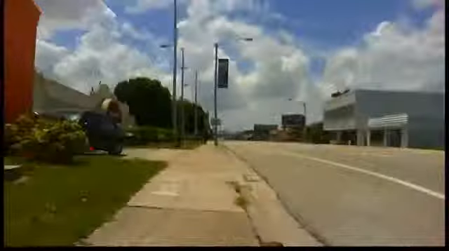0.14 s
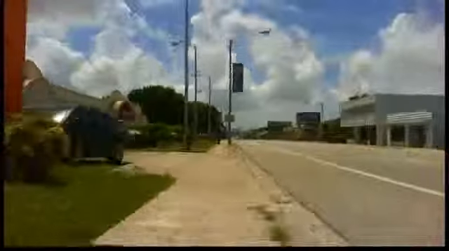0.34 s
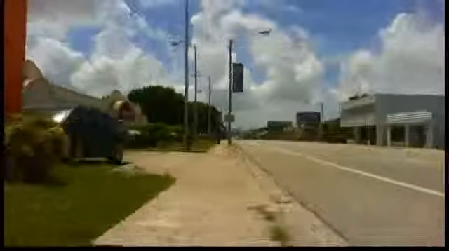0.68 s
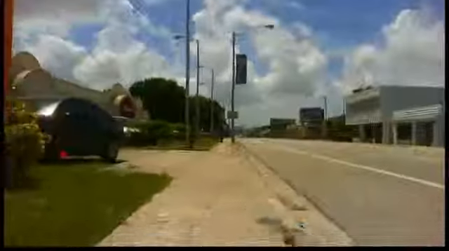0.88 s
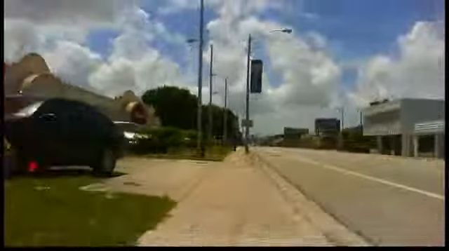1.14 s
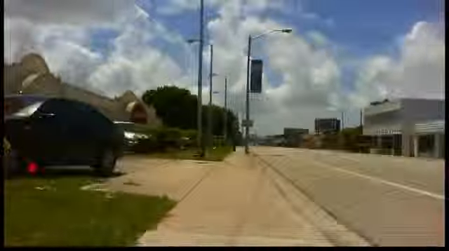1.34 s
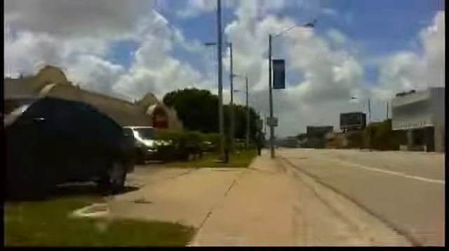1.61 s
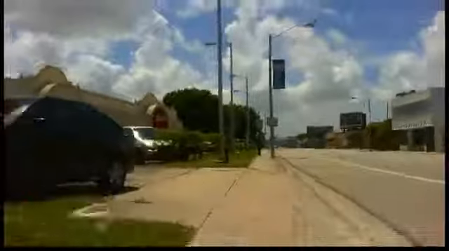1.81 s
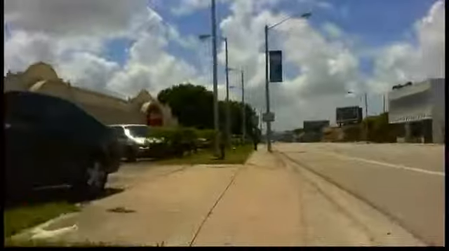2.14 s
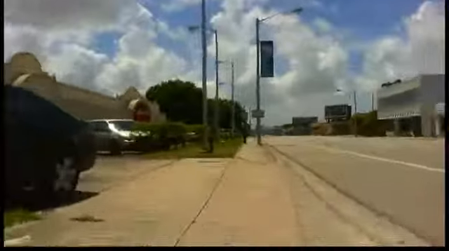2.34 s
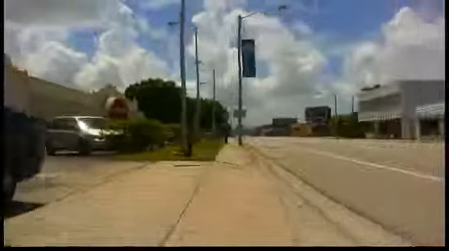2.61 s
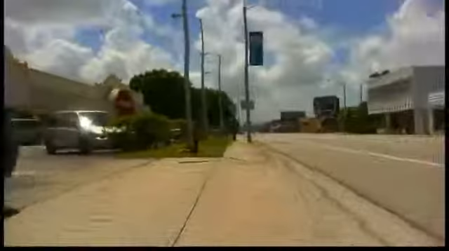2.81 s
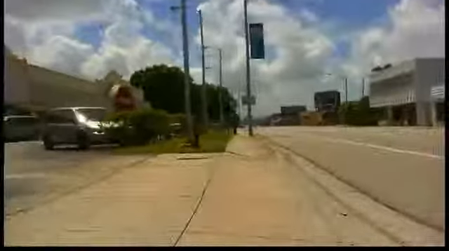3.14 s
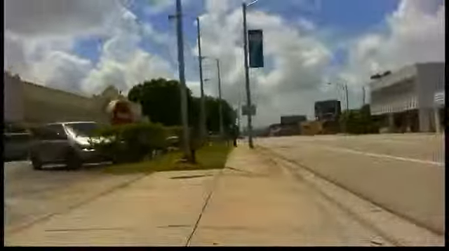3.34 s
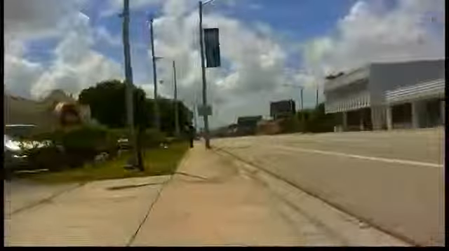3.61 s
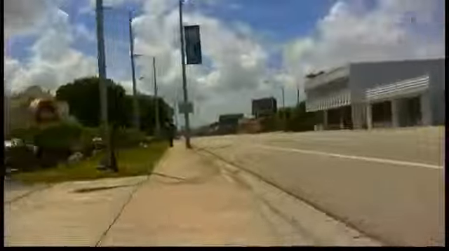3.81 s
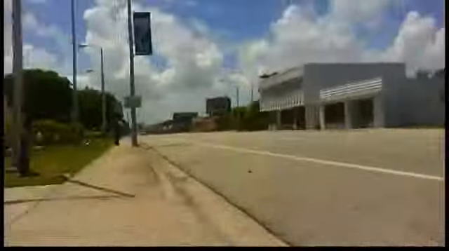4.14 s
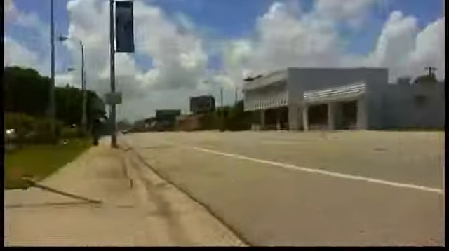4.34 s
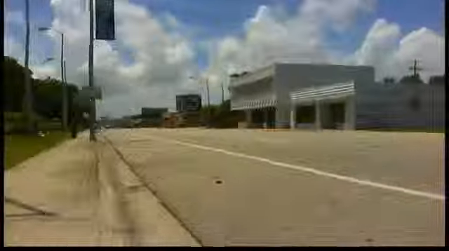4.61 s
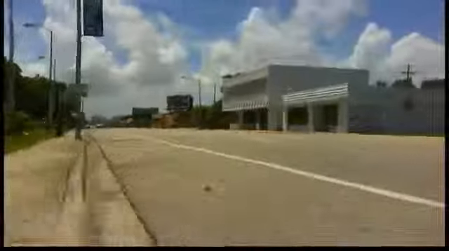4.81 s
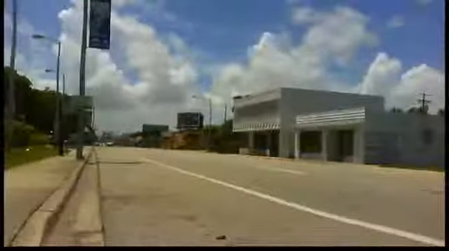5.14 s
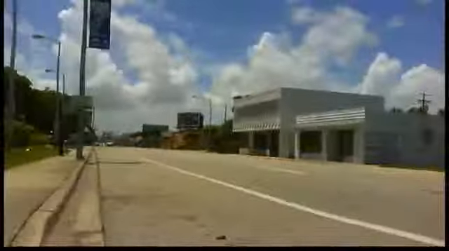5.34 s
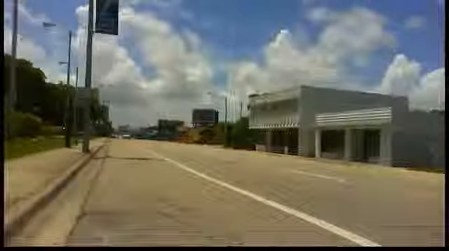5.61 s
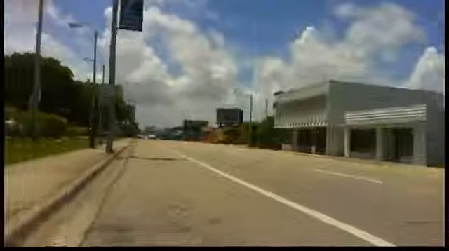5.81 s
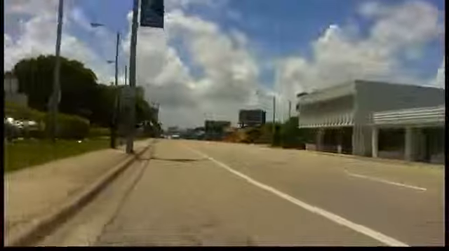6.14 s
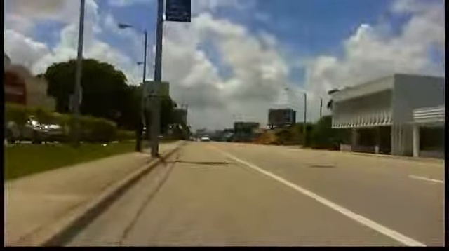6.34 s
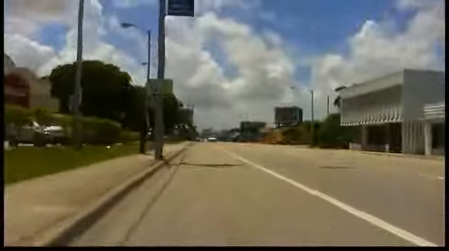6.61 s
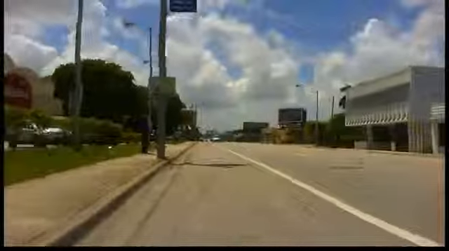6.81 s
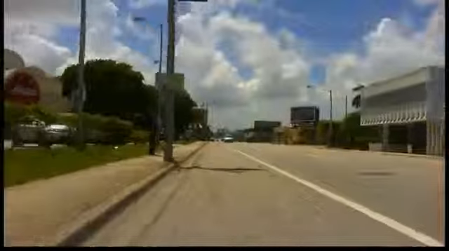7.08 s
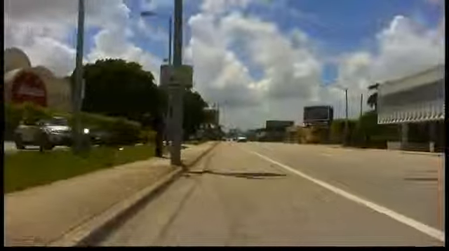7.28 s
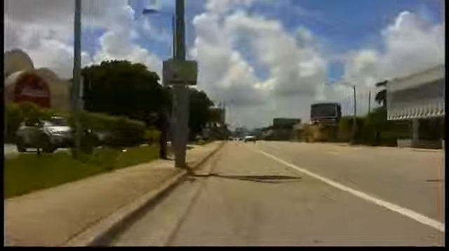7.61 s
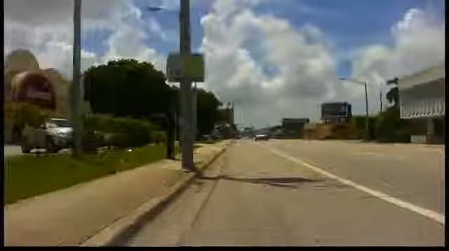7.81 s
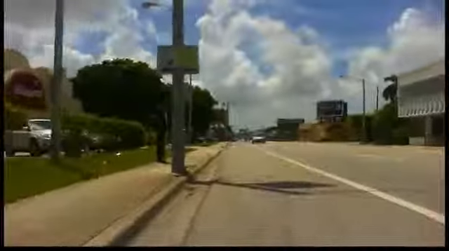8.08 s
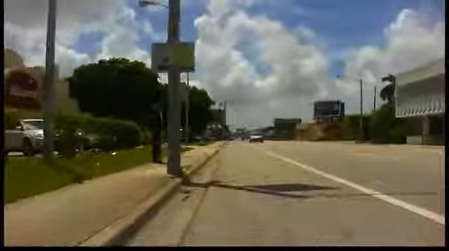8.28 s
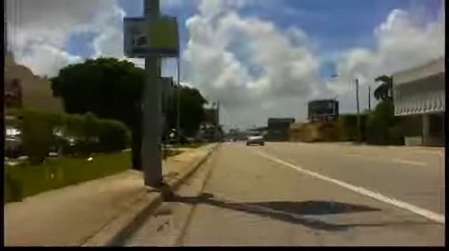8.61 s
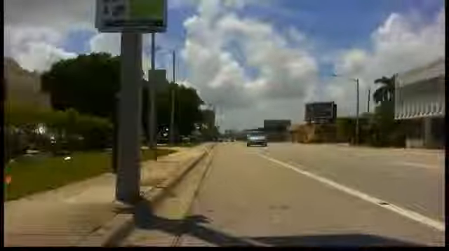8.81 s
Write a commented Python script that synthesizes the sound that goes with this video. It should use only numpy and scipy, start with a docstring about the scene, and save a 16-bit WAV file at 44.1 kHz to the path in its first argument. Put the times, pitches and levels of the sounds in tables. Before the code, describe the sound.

Outdoors on a moving bicycle, the clamped microphone carries steady low frame rumble, uneven bassy wind and faint electronic hiss with a very thin high whine. Small knocks and ticks open the first 0.2 seconds; wind punches at about 0.5, and a sharper knock lands at 1.0. Gusts thump near 1.4, then a hard hollow knock at 1.87. At 2.45 the bicycle bounces with a deep thud and a spray of metallic ticks, with more knocks until 3.0. From 3.1 to 4.0 it is calmer, with faint creaks and tiny chirps. A knock at 4.65 leads to the hardest blow at 4.8, then a thud, rattles and gusts from 5.1 to 5.55. After 5.9 the rumble is smoother and wind weaker. Dull knocks cluster from 7.2 to 7.6, with lighter ones at 7.85 and 8.45 before rolling on to about 9.

```python
"""Bicycle ride in the wind

A camera clamped to a bicycle rolls over pavement and then asphalt. Wind is uneven low noise with single hard pushes.
Noise and sharp blows through resonances make the rumble of the frame and the knocks of paving joints.
Loose parts tick and chatter as short noise bursts; squeaks and soft metal rings are short tones.
Joints creak and chirp in noisy or regular slips. The camera adds hiss and a whine, and its gain control
turns everything down after loud peaks."""
import sys
import numpy as np
from scipy import signal
from scipy.fft import rfft, irfft, next_fast_len
from scipy.io import wavfile
from scipy.ndimage import uniform_filter1d

SR = 44100
rng = np.random.default_rng(int(sys.argv[2]) if len(sys.argv) > 2 else 0)


def to_wav(s):
    """Save 16-bit WAV."""
    ch = np.atleast_2d(s).T  # columns
    pcm = np.round(np.clip(ch, -1, 1) * 32767)  # PCM
    wavfile.write(sys.argv[1], SR, pcm.astype(np.int16))


N = 394694
T = np.arange(N) / SR  # time in s

# All levels are set before the camera's gain control. Spectra and mode levels are relative.
# hard gusts on the microphone: t/s, peak/full scale (push above zero, pull below), length/s
GUSTS = [(0.437, 0.82, 0.12), (0.51, -0.89, 0.079), (1.027, -0.78, 0.038), (1.392, 0.88, 0.026),
         (1.454, -1.18, 0.039), (2.381, 0.65, 0.073), (2.673, -0.82, 0.035), (4.442, -0.81, 0.077),
         (5.129, 0.57, 0.035), (5.375, 0.36, 0.016), (5.467, 0.64, 0.023), (5.511, 0.66, 0.026),
         (5.541, -0.7, 0.11), (5.229, 0.44, 0.013)]
# wind at the microphone: t/s, level/dB
WIND_LEVEL = [(0.0, -16.5), (0.47, -17), (0.75, -23.5), (1.47, -11.5), (1.67, -24), (1.74, -14.5),
              (2.3, -20), (2.37, -11), (2.85, -17.5), (3.56, -25.5), (4.05, -18.5), (4.13, -14.5),
              (4.6, -16), (5.08, -22), (5.13, -13), (5.53, -14.5), (5.6, -20.5), (6.25, -26), (6.33, -19),
              (6.8, -22.5), (6.88, -33), (7.35, -19.5), (7.6, -25.5), (8.95, -29)]
# colour of the wind: f/Hz, level/dB per Hz
WIND_COLOUR = [(2, -50), (4, -13.5), (12, 3), (25, -4), (50, -9), (100, -17.5), (200, -34), (600, -43.5),
               (1500, -80)]
# surface under the tyres: t/s, road shaking/dB, chatter of loose parts/dB
SURFACE = [(0, -28, -50.5), (.45, -33, -64), (1.15, -28, -54.5), (1.65, -36, -59), (2.35, -27.5, -58),
           (2.57, -25, -48.5), (2.95, -29.5, -55), (3.9, -27, -62.5), (4.35, -30, -57), (5.0, -23, -60),
           (5.25, -29, -50), (5.55, -28, -54), (5.9, -28.5, -67), (7.05, -28, -61), (7.3, -24, -70.5),
           (7.7, -27, -69), (8.95, -26, -58)]
# coarse grit, between the modes of the frame: f/Hz, level/dB per Hz
GRIT_COLOUR = [(60, 3), (150, -10), (550, -20.5), (750, -40), (1300, -33.5), (4000, -45.5), (8000, -65)]
# modes of the frame: f/Hz, width/Hz, level/dB
FRAME_MODES = [(90.7, 27.7, 6.5), (196.5, 44.6, 7), (268.4, 48.2, -0.5), (338.2, 46.2, 5), (515, 43.4, -3),
               (634, 101, -16.5), (890, 80, -17), (1004, 82, -22)]
# a wheel meets a joint: t/s, blow level/dB, weight of the metal clang against the blow/dB,
# metal mode rung most f/Hz, band the clamp passes best f/Hz, decay time of the rough rebound/s
KNOCKS = [(.063, -14, -46, 2110, 790, 0.0089), (.171, -16.5, -29.5, 3500, 680, 0.0079),
          (0.196, -21, -33, 2970, 460, .015), (0.643, -18.5, -43, 4010, 494, 0.011),
          (.99, -12, -25.5, 2870, 518, 0.039), (1.865, -9, -28, 3500, 560, 0.043),
          (1.873, -14.5, -17.5, 2900, 338, 0.0044), (1.982, -23, -45, 3590, 340, 0.024),
          (2.434, -17.5, -37, 2060, 940, 0.01), (2.456, -11.5, -28.5, 2060, 440, 0.027),
          (2.798, -11, -40, 2040, 477, .04), (2.845, -13.5, -33, 3900, 480, 0.018),
          (3.02, -15, -32.5, 2640, 390, 0.026), (4.067, -18.5, -41, 2190, 403, .015),
          (4.647, -14.5, -27.5, 2980, 563, 0.035), (4.686, -36, -37, 3520, 500, 0.014),
          (4.813, -4, -36, 2190, 540, 0.041), (4.848, -16, -23, 2620, 890, 0.04),
          (5.193, -12.5, -38, 2550, 464, 0.093), (5.236, -12.5, -37, 3070, 477, 0.0094),
          (5.31, -20, -33, 2060, 890, 0.0096), (5.397, -24, -43, 2060, 900, 0.012),
          (5.461, -18, -31, 5020, 515, 0.029), (5.502, -14, -31.5, 2700, 465, 0.063),
          (5.789, -20.5, -31, 2970, 358, 0.0065), (7.242, -14, -42, 2970, 353, 0.033),
          (7.309, -14.5, -37, 2970, 513, 0.045), (7.334, -10.5, -35, 2970, 500, 0.05),
          (7.433, -21, -37, 2970, 890, 0.028), (7.533, -13.5, -49, 2060, 378, 0.039),
          (7.624, -16.5, -41, 2970, 360, 0.039), (7.842, -22, -47, 2060, 400, 0.017),
          (8.45, -17, -27, 2960, 510, 0.02)]
# modes of thin metal: f/Hz, level/dB, time to fall 60 dB/s
METAL_MODES = [(2060, 10, 0.04), (2270, 9, 0.057), (2700, 6, 0.12), (2976, 9, 0.091), (3200, 8.5, 0.042),
               (3500, 9, .045), (3930, 3, 0.14), (4320, -1, 0.11), (5630, 6, 0.03)]
# a tyre lands hard and the whole bicycle bounces: t/s, level/dB, pitch f/Hz, time to fall 60 dB/s
THUDS = [(2.458, -6.5, 79, 0.26), (2.456, -11, 150, 0.16), (5.166, -7.5, 174, 0.084),
         (7.24, -23.5, 183, 0.13)]
# loose parts tap: t/s, level/dB, top end against the rest/dB, pitch of the ring f/Hz
TICKS = [(0.0877, -32.5, -19, 1500), (0.101, -41, -20, 2060), (0.115, -34, -7, 5150),
         (0.144, -37, -35.0, 1880.0), (0.182, -34, -3, 2030.0), (0.195, -40, -2, 3330.0),
         (0.2152, -32, -12, 4840), (0.588, -42, -15, 4000.0), (0.651, -38, -11, 4820.0),
         (0.9889, -25, -13, 3900), (1.125, -25, -11.0, 4120), (1.14, -38, -21.0, 3270.0),
         (1.1644, -36.5, -21, 4890.0), (1.2666, -31.5, -23, 3800), (1.385, -48, -25, 1300),
         (1.6214, -36.5, -4, 5270.0), (1.645, -44, -20, 2100), (1.753, -46, -18, 3500),
         (1.866, -29.5, -30, 3470), (2.4344, -22, -18, 1800), (2.452, -25.5, -14, 5460.0),
         (2.465, -24, -7, 2130), (2.484, -30, -6, 5050.0), (2.495, -34, -10, 4630.0),
         (2.507, -34, -15, 4950.0), (2.512, -39, -16.0, 4600.0), (2.533, -34, -14, 3385),
         (2.5398, -28, -3.5, 4160.0), (2.545, -30.5, -8.0, 2120), (2.556, -33, -8, 3880.0),
         (2.613, -32, -25, 5170.0), (2.635, -56, -20, 5500), (2.674, -32, -22.0, 2040),
         (2.724, -36, -11, 6500.0), (2.854, -35, -9, 4650.0), (2.918, -33, -21.0, 1950.0),
         (2.948, -42, -15.0, 4540.0), (3.021, -36, -11, 1580.0), (3.115, -43, -15.0, 6890.0),
         (3.656, -42, -17.0, 5220.0), (4.216, -48, -20, 5300), (4.312, -41, -20, 2700),
         (4.7032, -37.5, -15.0, 4310.0), (4.817, -29, -13, 2240.0), (4.8464, -31, -18, 3460),
         (4.8743, -30.5, -11, 4040), (4.895, -38, -20.0, 4310.0), (4.912, -42, -22.0, 5240.0),
         (4.969, -41, -16, 4830.0), (5.072, -32, -22, 1520.0), (5.082, -27.5, -21, 5000),
         (5.095, -52, -8.0, 1640.0), (5.113, -40, -23.0, 5350.0), (5.1666, -29.5, -25, 2670.0),
         (5.187, -34, -17, 4700.0), (5.1938, -33, -5, 2770.0), (5.2328, -37, -5, 3890.0),
         (5.2783, -32, -10, 1947), (5.312, -33, -21, 1960.0), (5.33, -38, -15, 3380.0),
         (5.391, -37, -26.0, 1820), (5.421, -37, -19, 1930.0), (5.452, -40, -23, 5200),
         (5.527, -44, -13.0, 3930.0), (5.618, -38.5, -18, 3990.0), (5.653, -39, -21.0, 5280.0),
         (5.776, -42, -19.0, 4110.0), (5.8195, -37.5, -14.0, 4770.0), (5.8432, -42.5, -28.0, 5340.0),
         (7.468, -43, -20, 4500), (8.889, -42, -25, 3400)]
# colour of tapping and scraping: f/Hz, level/dB per Hz
TAP_COLOUR = [(700, 18.5), (1500, 18.5), (3000, 6.5), (5500, 7.5), (7500, 4.5), (9500, -3), (15000, -60)]
# a dry joint squeaks, or thin metal rings softly near 2.7 to 3 kHz:
# t/s, length/s, first pitch f/Hz, pitch it slides towards f/Hz, level/dB
SQUEAKS_AND_RINGS = [(1.906, 0.052, 6500, 6040, -46.5), (2.09, 0.028, 6840, 6740, -60),
                     (3.035, 0.041, 7060, 6850, -52.5), (3.101, 0.063, 7140, 6530, -49.5),
                     (5.153, 0.033, 2640, 2660, -42), (5.477, 0.059, 2700, 2690, -56),
                     (5.906, 0.055, 6680, 6120, -40), (7.283, 0.09, 3000, 3050, -56),
                     (7.867, 0.023, 6800, 6920, -47)]
# a loaded joint creaks: t/s, length/s, level/dB
CREAKS = [(0.161, 0.047, -47), (0.294, 0.11, -47), (0.4, 0.055, -45.5), (1.008, 0.056, -50),
          (1.294, 0.056, -43.5), (2.296, 0.081, -41.5), (2.459, 0.033, -40), (2.522, 0.03, -36),
          (3.301, 0.056, -47), (3.371, 0.14, -49), (3.539, 0.089, -47), (3.832, 0.097, -44.5),
          (3.977, 0.097, -48.5), (4.174, 0.067, -48.5), (4.293, 0.065, -46.5), (4.404, 0.02, -44),
          (4.423, 0.08, -42.5), (4.617, 0.052, -46), (4.824, 0.06, -45), (5.172, 0.041, -40),
          (5.284, 0.082, -50), (6.057, 0.065, -42.5), (6.111, 0.058, -48), (6.254, 0.031, -49.5),
          (6.391, 0.048, -45), (6.607, 0.089, -52), (6.756, 0.13, -53), (6.979, 0.075, -47),
          (7.288, 0.081, -55), (7.556, 0.065, -46.5)]
# middle values of the joint's modes: f/Hz, width/Hz, level/dB
JOINT_MODES = [(955, 210, 11), (1720, 460, 1.5), (2310, 270, 2.5), (2700, 120, -2), (4000, 230, 0.5),
               (5000, 300, 1.5), (5840, 260, -7), (6800, 210, -8.5)]
# regular slips whistle low: t/s, length/s, pitch f/Hz, level/dB
CHIRPS = [(0.944, 0.052, 1300, -55), (3.415, 0.035, 1300, -54), (3.756, 0.027, 1340, -62),
          (5.768, 0.038, 1324, -50)]
# colour of the chirps' harmonics: f/Hz, level/dB
CHIRP_COLOUR = [(1300, -2.5), (2600, -10), (3900, -3), (5200, -6), (8000, -14)]
# colour of the camera's hiss: f/Hz, level/dB per Hz
HISS_COLOUR = [(700, 1), (1500, 0.5), (3600, -3), (6000, -2.5), (10000, -5.5), (14700, -4), (15300, -36)]

HISS_DB, WHINE_HZ, WHINE_DB = -58, 12590, -69.5  # the whine wavers around these values
EDGE_HZ = 15450
HARD_DB = 4  # per octave: how much a blow of -5 dB favours the upper frame modes
HARDER_DB = 0.29  # how much HARD_DB rises for each dB of blow
CLAMP_WIDTH_HZ, CLAMP_DB = 63, 5.5  # band of a blow that the clamp favours, and its added weight
TICK_RISE_S, TICK_T60_S = 0.00027, 0.0098
SETTLE = 0.3  # share of a squeak or ring in which the pitch slides most of the way


def gain_of(db):
    """Turns dB into a plain multiplier."""
    return 10 ** (np.asarray(db) / 20)


def evened(x):
    """Brings a signal to an average (RMS) level of 1."""
    return x / np.sqrt(np.mean(x ** 2) + 1e-20)


def add(mix, s, sound):
    """Lays a short sound into the mix from s seconds on."""
    part = mix[round(s * SR):][:len(sound)]
    part += sound[:len(part)]


def ride(rows, order):
    """Draws straight lines through one column of a timed table."""
    columns = np.transpose(rows)
    return np.interp(T, columns[0], columns[order])


def read(points, hz):
    """Reads a spectrum table between its points, on a log pitch scale."""
    f, value = np.transpose(points)
    return np.interp(np.log(hz + 1), np.log(f + 1), value)


def coloured(x, points):
    """Shapes a signal by a spectrum table."""
    size = next_fast_len(len(x))
    gain = gain_of(read(points, np.fft.rfftfreq(size, 1 / SR)))
    return irfft(rfft(x, size) * gain, size)[:len(x)]


def drift(hz):
    """Bounded chance that heads for a new value hz times a second."""
    steps = np.tanh(rng.standard_normal(4000) / 2) * 2.6
    return np.interp(T * hz, np.arange(4000), steps)


def ring(x, hz, width):
    """A two-pole resonance of peak gain 1."""
    return signal.lfilter(*signal.iirpeak(hz, hz / width, SR), x)


def wind():
    """Lumpy air pressure at the microphone port, with single hard gusts."""
    lumps = evened(coloured(rng.standard_normal(N), WIND_COLOUR) * gain_of(2.8 * drift(12)))
    # keep slow swells shallow
    swell = uniform_filter1d(lumps ** 2, 9000)
    out = evened(lumps / (swell + 0.05) ** 0.35) * gain_of(ride(WIND_LEVEL, order=1))
    for s, peak, length in GUSTS:
        near = slice(round((s - 0.15) * SR), round((s + 0.15) * SR))
        bump = np.exp(-((T[near] - s) / length * 6.53) ** 2)
        out[near] = out[near] * (1 - bump) + peak * bump  # the gust takes over from the wind
    return out


def frame(force, hard_db=0):
    """Tubes and clamp answer any force with the same modes; a hard blow favours the upper ones."""
    out = 0
    for k, (hz, width, db) in enumerate(FRAME_MODES):
        mode = ring(ring(force, hz, 4 * width), hz, width)
        sign = (-1) ** k  # neighbouring modes move in opposite directions
        out = out + sign * gain_of(db + hard_db * np.log2(hz / 400)) * mode
    return out


def road():
    """Surface grain shakes the frame in uneven bumps; coarse grit comes in quicker, deeper flurries."""
    force = rng.standard_normal(N) * gain_of(2.47 * drift(25) + drift(90))
    soft = signal.lfilter(*signal.butter(2, 900, fs=SR), force)  # the tyre cushions the finest grain
    flurries = rng.standard_normal(N) * gain_of(1.6 * drift(15) + 2.6 * drift(60))
    grit = coloured(flurries, GRIT_COLOUR)
    return gain_of(ride(SURFACE, order=1)) * evened(evened(frame(soft)) + 0.5 * evened(grit))


def lean_db(hz, struck_hz):
    """Metal modes near the one struck most ring louder."""
    return 8 * np.exp(-((hz - struck_hz) / 250) ** 2)


def knocks():
    """A sharp blow and its rough rebound ring the frame; thin metal clangs with it, never twice alike."""
    out, t = np.zeros(N), T[:6000]
    for s, db, clang_db, struck_hz, clamp_hz, rebound in KNOCKS:
        rough, waver, grit = rng.standard_normal((3, len(t)))
        fade = np.exp(-t / rebound)
        blow = np.exp(-t / 0.00014) + 0.26 * rough * fade
        blow = blow + gain_of(CLAMP_DB) * ring(blow, clamp_hz, CLAMP_WIDTH_HZ)
        body = frame(blow, HARD_DB + HARDER_DB * (db + 5)) * np.exp(-t / (1.04 * rebound))
        clang = 0
        for hz, mode_db, t60 in METAL_MODES:
            level_db = mode_db + 2.0 * rng.standard_normal() + lean_db(hz, struck_hz)
            tone = np.sin(2 * np.pi * (hz * t + rng.random()))
            clang = clang + gain_of(level_db - 60 * t / t60) * tone
        clang = clang * (1 + 0.78 * evened(uniform_filter1d(waver, 90))) / 6
        clang = clang + 0.67 * evened(coloured(grit, TAP_COLOUR)) * fade
        add(out, s, gain_of(db) * (body / abs(body).max() + gain_of(clang_db) * clang))
    return out


def thuds():
    """The bouncing bicycle is a low sine that dies away."""
    out, t = np.zeros(N), T[:6000]
    for s, db, hz, t60 in THUDS:
        add(out, s, gain_of(db - 60 * t / t60) * np.sin(2 * np.pi * hz * t))
    return out


def ticks():
    """Each tap is a sharp edge and a short noisy ring at a pitch of its own, some with a bright top."""
    out, t = np.zeros(N), T[:3000]
    top = signal.butter(3, 8000, "high", fs=SR, output="sos")
    for s, db, top_db, hz in TICKS:
        a, b = rng.standard_normal((2, len(t)))
        # the part bounces to rest
        hops = (rng.random(len(t)) < 100 / SR) * rng.random(len(t)) * np.exp(-t / 0.011)
        bounces = 0.3 * signal.lfilter([1], [1, -np.exp(-1 / (SR * 0.002))], hops)
        # noise thinned to a band around the pitch
        thin = coloured(a, TAP_COLOUR)
        thin = signal.lfilter(*signal.butter(4, hz * 0.68, "high", fs=SR), thin)
        thin = signal.lfilter(*signal.butter(1, min(hz * 2.5, 12000), fs=SR), thin)
        tap = evened(thin + 0.38 * ring(thin, hz, hz * 0.52))
        tap = tap + gain_of(top_db) * evened(signal.sosfilt(top, b))
        rise = np.minimum(t / TICK_RISE_S, 1)
        fade = gain_of(-60 * t / TICK_T60_S) + 0.19 * np.exp(-t / 0.02) + bounces
        add(out, s, gain_of(db) * rise * tap * fade)
    return out


def chatter():
    """Loose parts tremble: tiny taps, dull, middling or bright, over faint scraping, ring thin metal."""
    size = gain_of(3 * np.minimum(rng.exponential(1, N), 2.5))
    size = size * (rng.random(N) < 150 / SR)  # about 150 taps a second
    part = rng.integers(0, 3, N)
    taps = 0
    for k, hz in enumerate([2200, 4200, 6300]):
        shake = signal.lfilter([1], [1, -np.exp(-1 / (SR * 0.004))], size * (part == k))
        taps = taps + ring(rng.standard_normal(N) * shake, hz, 1500.0)
    uneven = rng.standard_normal(N) * gain_of(2.5 * drift(35) + 2.5 * drift(130))
    force = evened(taps) + 0.6 * evened(coloured(uneven, TAP_COLOUR))
    clang = sum(gain_of(db) * ring(force, hz, 2.2 / t60) for hz, db, t60 in METAL_MODES)
    return gain_of(ride(SURFACE, order=2)) * evened(evened(force) + 0.28 * evened(clang))


def squeaks_and_rings():
    """Squeaks and soft metal rings: a tone of wavering level with a weak octave, sliding in pitch."""
    out = np.zeros(N)
    for s, length, first_hz, last_hz, db in SQUEAKS_AND_RINGS:
        t = np.arange(0, length, 1 / SR)
        hz = last_hz + (first_hz - last_hz) * np.exp(-(t / length / SETTLE) ** 2)
        turn = 2 * np.pi * np.cumsum(hz) / SR
        waver = 1 + 0.36 * evened(uniform_filter1d(rng.standard_normal(4000), 120))[:len(t)]
        tone = np.sin(turn) + gain_of(-22) * np.sin(2 * turn)
        fades = signal.windows.tukey(len(t), 0.6)
        add(out, s, np.sqrt(2) * gain_of(db) * waver * tone * fades)
    return out


def creaks():
    """Dense uneven slips under load ring the joint, whose modes sit a little differently each time."""
    out = np.zeros(N)
    for s, length, db in CREAKS:
        size, flutter = rng.standard_normal((2, 8000))
        slips = size * (rng.random(8000) < 1500 / SR)  # about 1500 slips a second
        slips = slips * gain_of(2.5 * evened(uniform_filter1d(flutter, 300)))
        shifts = rng.standard_normal((len(JOINT_MODES), 2))
        rung = 0
        for (middle_hz, width, mode_db), (a, b) in zip(JOINT_MODES, shifts):
            hz = middle_hz * (1 + 0.03 * b)
            mode = ring(ring(slips, hz, 5 * width), hz, width)
            rung = rung + gain_of(mode_db + 2 * a) * mode
        scrape = evened(evened(rung) + 0.81 * evened(coloured(slips, TAP_COLOUR)))
        count = round(length * SR)
        add(out, s, gain_of(db) * scrape[:count] * signal.windows.tukey(count, 0.5))
    return out


def chirps():
    """Fast slips lock into a short, slightly rough stack of six harmonics."""
    out = np.zeros(N)
    for s, length, hz, db in CHIRPS:
        noise = rng.standard_normal((2, 4000))[:, :round(length * SR)]
        wobble = 1 + 0.0043 * evened(uniform_filter1d(noise[0], 200))
        turn = 2 * np.pi * np.cumsum(hz * wobble) / SR
        slips = sum(gain_of(read(CHIRP_COLOUR, k * hz)) * np.cos(k * turn) for k in range(1, 7))
        rough = 1 + 0.5 * evened(uniform_filter1d(noise[1], 40))
        add(out, s, gain_of(db) * evened(slips) * rough * signal.windows.tukey(len(turn), 0.4))
    return out


def camera():
    """The electronics hiss and carry a thin wavering whine."""
    hz = WHINE_HZ + 50 * drift(5) + 35 * drift(25)
    tone = np.sin(2 * np.pi * np.cumsum(hz) / SR)
    whine = np.sqrt(2) * gain_of(WHINE_DB + drift(40)) * tone
    hiss = gain_of(HISS_DB) * evened(coloured(rng.standard_normal(N), HISS_COLOUR))
    return hiss + whine


def scene():
    """Adds all the sources into one channel."""
    bicycle = road() + knocks() + thuds()
    parts = ticks() + chatter() + squeaks_and_rings() + creaks() + chirps()
    return (wind() + bicycle + parts + camera())[None]


def record(dry):
    """Gain drops almost at once on peaks and recovers slowly; then a soft ceiling and the band limit."""
    peak_db = 20 * np.log10(abs(uniform_filter1d(dry[0], 60)) + 1e-9)
    fall = T * 25.0  # recovers 25 dB a second
    held_peak_db = np.maximum.accumulate(peak_db + fall) - fall
    over_db = np.maximum(held_peak_db + 4.8, 0)  # acts above -4.8 dB
    ducked = dry / gain_of(uniform_filter1d(over_db, 100))
    ceiling = 0.62  # of full scale
    capped = ceiling * np.tanh((abs(ducked) / ceiling) ** 4) ** (1 / 4) * np.sign(ducked)
    edge = signal.firwin(2047, EDGE_HZ, window=("kaiser", 9), fs=SR)
    return signal.oaconvolve(capped, edge[None], "same")


dry = scene()
out = record(dry)
to_wav(out)
```